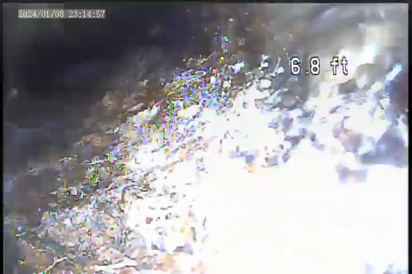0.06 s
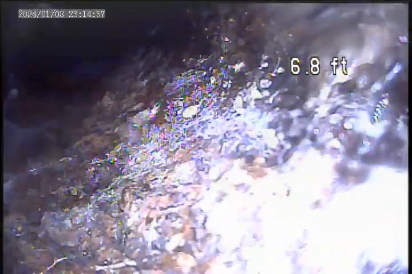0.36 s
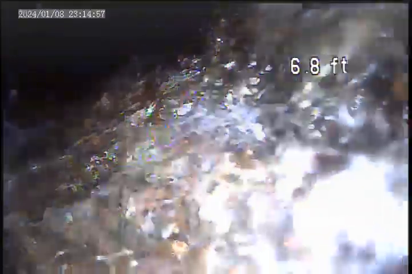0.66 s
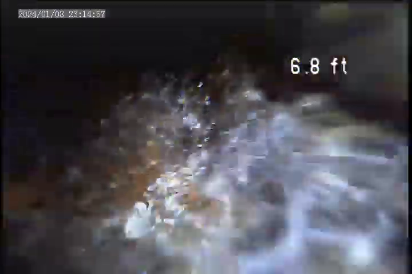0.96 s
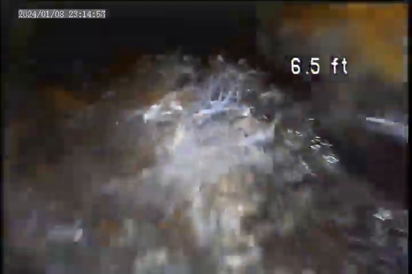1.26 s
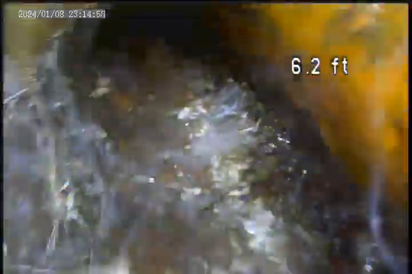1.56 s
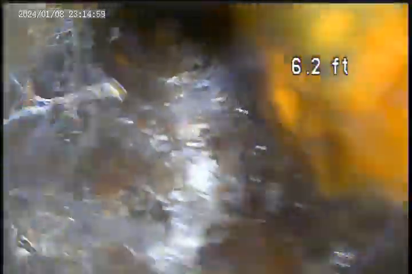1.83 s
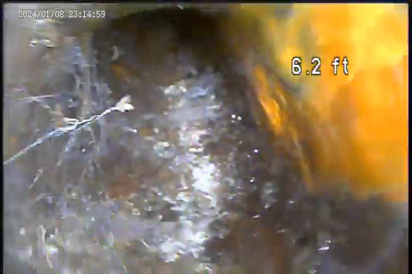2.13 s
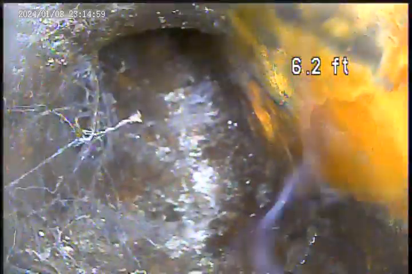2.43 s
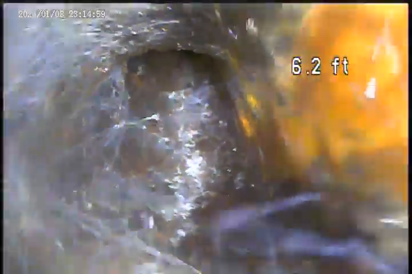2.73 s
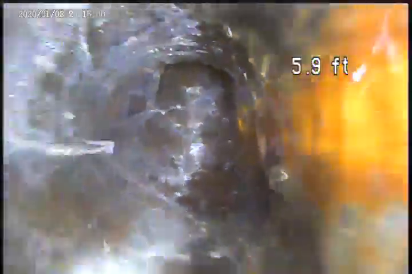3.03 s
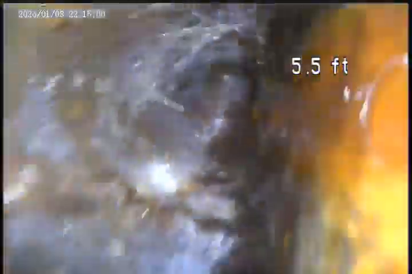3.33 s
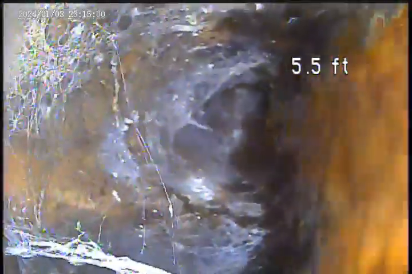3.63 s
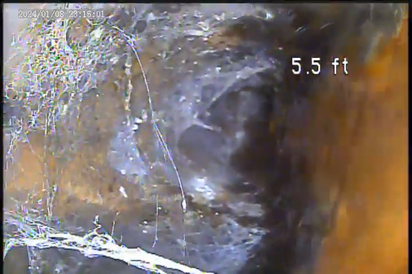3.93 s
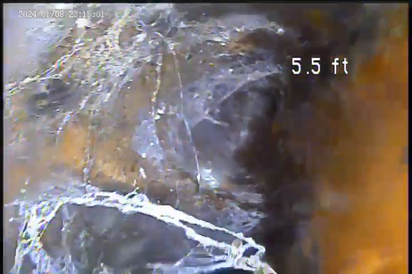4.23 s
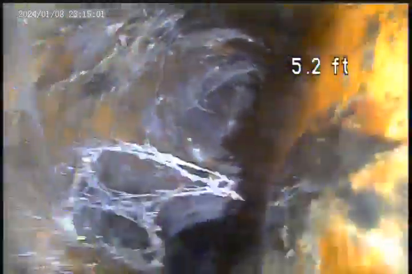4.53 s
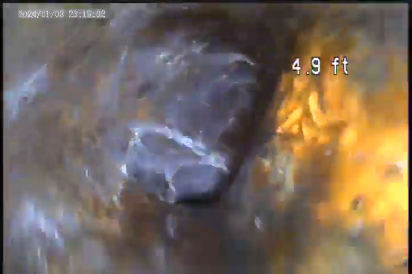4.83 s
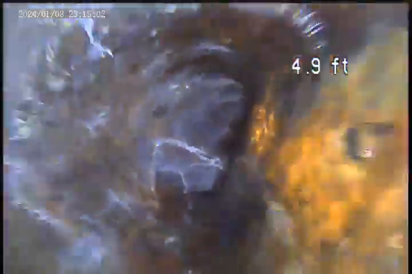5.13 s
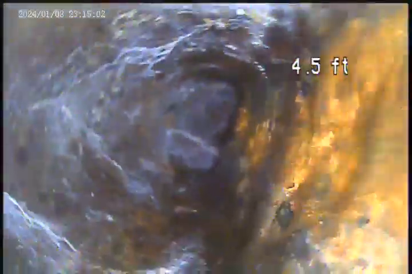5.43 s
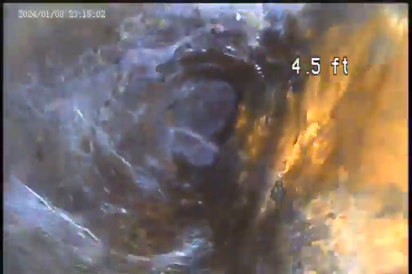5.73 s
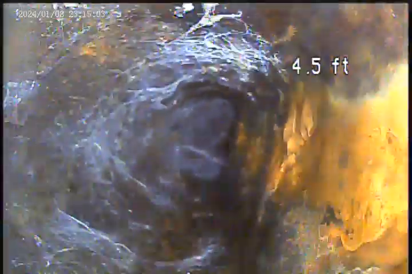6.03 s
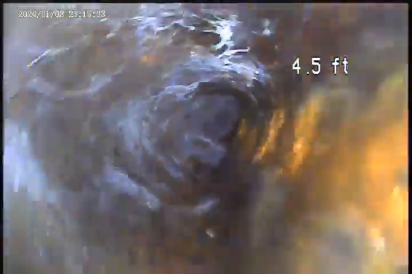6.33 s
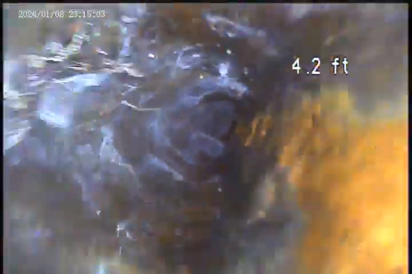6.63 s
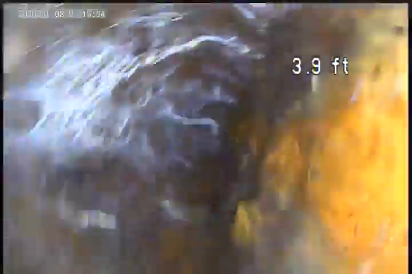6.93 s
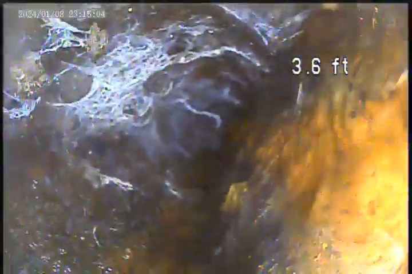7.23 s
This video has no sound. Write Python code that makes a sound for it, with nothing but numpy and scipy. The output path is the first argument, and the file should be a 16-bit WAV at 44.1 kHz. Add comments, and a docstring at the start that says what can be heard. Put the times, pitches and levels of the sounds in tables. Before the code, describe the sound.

A steady low electrical buzz runs throughout, over rumble, a faint equipment whirr and hiss. A drain camera's push cable is drawn back in short pulls, each making a soft rubbing swish. Now and then it clacks against its reel, ringing briefly in a small hard room, with the sharpest clack past the middle. Everything is heard from the monitor.

```python
"""A drain camera's push cable slides back in short pulls and now and then clacks against its reel.
The jacket rubs with a swish that follows each pull; a clack rings the reel and a small hard room.
Heard at the monitor, where the picture signal leaks into the sound as a low buzz, one pulse a
video frame, over rumble, equipment whirr and hiss."""
import sys
import numpy as np
from scipy import signal
from scipy.fft import rfft, irfft
from scipy.io import wavfile
from scipy.ndimage import uniform_filter1d

SR = 44100
rng = np.random.default_rng(int(sys.argv[2]) if len(sys.argv) > 2 else 0)


def int16_out(signal):
    """Quantize to a 16-bit WAV file."""
    q = np.round(np.clip(np.atleast_2d(signal).T, -1, 1) * 32767)
    wavfile.write(sys.argv[1], SR, q.astype(np.int16))


N = 325017
TIME = np.arange(N) / SR


def amp(db):
    """Decibels to gain."""
    return 10 ** (np.asarray(db) / 20)


def unit(x):
    """Scale to rms 1."""
    return x / np.sqrt(np.mean(x ** 2) + 1e-20)


def lookup(curve, hz):
    """Interpolate a table on a log-frequency axis."""
    freq_hz, value = np.transpose(curve)
    return np.interp(np.log(hz + 1), np.log(freq_hz + 1), value)


def add(mix, start_s, sound):
    """Mix a sound in at start_s."""
    part = mix[max(round(start_s * SR), 0):][:len(sound)]
    part += sound[:len(part)]


def shaped_noise(spectrum):
    """Noise with a tabled spectrum, rms 1."""
    gain = amp(lookup(spectrum, np.fft.rfftfreq(N, 1 / SR)))
    return unit(irfft(rfft(rng.standard_normal(N)) * gain, N))


def band_noise(centre_hz, width_hz):
    """Noise in one resonance, rms 1; a random drift when centred on 0 Hz."""
    detune = (np.fft.rfftfreq(N, 1 / SR) - centre_hz) / width_hz
    return unit(irfft(rfft(rng.standard_normal(N)) / (1 + detune ** 2), N))


# Equipment whirr: centre_hz, width_hz, level_db
WHIRR_BANDS = [(846, 76, -68.5), (960, 99, -72.5), (1420, 276, -76), (2080, 110, -88)]
# Hum and line-scan whistle: freq_hz, level_db
STEADY_TONES = [(50, -66), (15734, -95)]
# Low rumble: freq_hz, density_db
RUMBLE_SPECTRUM = [(8, -13), (18, -5.5), (27, 6.5), (38, -7.5), (68, 0.5), (90, -3.5), (115, -3.5),
                   (160, -8.5), (210, -16), (280, -12), (390, -20.5), (540, -20), (700, -24.5), (1200, -32),
                   (3000, -59.5)]
# Electronic hiss: freq_hz, density_db
HISS_SPECTRUM = [(300, -7), (1200, -0.5), (2000, 3.5), (4500, 1.5), (6500, -1), (10000, -2.04), (15500, -1)]


def background(rumble_db=-50.5, hiss_db=-68.5):
    """Rumble under the equipment's airy whirr, steady tones and hiss."""
    whirr = sum(amp(db) * band_noise(hz, width_hz) for hz, width_hz, db in WHIRR_BANDS)
    tones = sum(amp(db) * unit(np.sin(2 * np.pi * hz * TIME)) for hz, db in STEADY_TONES)
    rumble = amp(rumble_db) * shaped_noise(RUMBLE_SPECTRUM)
    hiss = amp(hiss_db) * shaped_noise(HISS_SPECTRUM)
    return rumble + whirr + tones + hiss


# Partials of the frame rate: harmonic, gain_db
BUZZ_PARTIALS = [(1, 1.5), (2, -4.5), (3, -5), (4, -5.5), (5, -11.5), (6, -12.5), (7, -14.5), (8, -17.5),
                 (9, -21), (10, -24.5), (11, -25.5), (12, -24.5), (13, -31), (14, -28.5), (15, -32.5),
                 (16, -50), (17, -30), (18, -31.5), (19, -32), (20, -33.5)]
FRAME_HZ, FIRST_FRAME_S = 29.969, 0.00973


def frame_buzz(level_db=-44.5, rasp_db=-68, flutter=0.044, lilt=0.039,
               jitter_s=0.00017, bass_cut_hz=36, spike_s=0.0016):
    """Picture signal leaking into the sound: one sharp, raspy pulse a frame, uneven in height."""
    cycles = (TIME - FIRST_FRAME_S + jitter_s * band_noise(0, 0.79)) * FRAME_HZ
    wave = np.zeros(N)
    for harmonic, gain_db in BUZZ_PARTIALS:
        lead_rad = np.arctan((bass_cut_hz / (harmonic * FRAME_HZ)) ** 2)  # from the input's bass cut
        wave += amp(gain_db) * np.cos(2 * np.pi * harmonic * cycles + lead_rad)
    frame = np.round(cycles).astype(int)
    spike = np.exp(-((cycles - frame) / FRAME_HZ / spike_s) ** 2)
    third_frame_accent = lilt * np.cos(2 * np.pi * cycles / 3)
    height = 1 + third_frame_accent + flutter * spike * np.tanh(rng.standard_normal(N))[frame]
    rasp = unit(spike * band_noise(240, 170))
    return amp(level_db) * unit(wave) * height + amp(rasp_db) * rasp


# Colour of a clack: freq_hz, density_db
CLACK_SPECTRUM = [(200, -23), (700, -8), (1300, -6.5), (2100, -0.5), (3000, 0.5), (4200, 3.5), (5200, -0.5),
                  (6200, -6), (7600, -6), (11000, -9), (15500, -17)]


def rough_contact(contact_s, fft_size=4096, bands=70):
    """A snap: each part of the spectrum leaves after its own random delay, scaled by contact_s."""
    hz = np.fft.rfftfreq(fft_size, 1 / SR)
    band_delay_s = contact_s * rng.gamma(3, 0.5, bands)
    delay_s = np.interp(hz, np.linspace(0, SR / 2, bands), band_delay_s)
    phase_rad = -2 * np.pi * np.cumsum(delay_s) * SR / fft_size
    snap = irfft(amp(lookup(CLACK_SPECTRUM, hz)) * np.exp(1j * phase_rad))[:fft_size // 2]
    return np.pad(snap, (0, SR - len(snap)))


# Small hard room: freq_hz, t60_s
ROOM_DECAY = [(500, .4), (1500, 0.51), (4000, 0.48), (8000, 0.43), (15000, 0.23)]


def room_tail(build_s=0.1, near_db=2, near_s=0.017):
    """A clack's reflections: near surfaces first, then a dense field dying band by band."""
    hz, t, noise = signal.stft(rng.standard_normal(SR), SR, nperseg=128)
    arrivals = np.hypot(amp(near_db) * np.exp(-t / near_s), 1 - np.exp(-t / build_s))
    decay_db = 60 * t / lookup(ROOM_DECAY, hz)[:, None]
    gain = amp(lookup(CLACK_SPECTRUM, hz)[:, None] - decay_db) * arrivals
    return signal.istft(noise * gain, SR, nperseg=128)[1][:SR]


# Reel resonances: freq_hz, gain_db, t60_s
REEL_MODES = [(1330, 4.5, 0.06), (1810, 0.5, 0.1), (2020, -15, 0.061), (2180, 8.5, 0.051), (2330, 9, .06),
              (3280, 11, 0.057), (4170, -24, 0.069), (4000, -22, 0.15), (4520, 3, .05), (4580, -12, 0.028),
              (4900, 0, 0.086), (5735, -32, .05), (7330, -18, 0.08), (7360, 4, 0.085), (10600, 7, 0.023)]
# Cable hits on the reel: start_s, level_db, contact_s, pitch_hz, cutoff_hz
REEL_HITS = [(0.453, -60, .002, 5200, 6000), (0.477, -56, 0.0018, 3200, 4000),
             (0.5044, -46, .0026, 2230, 5290), (0.5137, -52.5, 0.0014, 3260, 3600),
             (.7370, -62.5, 0.0011, 4460, 6000), (0.8257, -59, 0.0024, 2800, 5000),
             (.9930, -66, 0.0026, 2400, 2820), (2.2758, -44, 0.0018, 3720, 5950),
             (2.3420, -55.5, 0.0034, 5010, 6470), (3.019, -60, 0.001, 2750, 2620),
             (3.3750, -56, 0.0043, 4160, 9000), (3.6032, -62, 0.002, 2500, 2620),
             (4.822, -59, 0.00063, 3320, 3650), (5.223, -32, 0.00055, 5190, 17000),
             (5.9538, -62, .001, 5030, 5460), (6.522, -51, 0.0014, 2434, 4300),
             (6.531, -61, 0.00089, 3400, 4070)]


def reel_clacks(knock_db=-7, knock_s=0.0018, ring_db=-8, room_db=-0.5):
    """The cable strikes the reel: a snap and a dead knock, then reel ring and room tail."""
    t, out = np.arange(SR) / SR, np.zeros(N)
    for start_s, level_db, contact_s, pitch_hz, cutoff_hz in REEL_HITS:
        snap = rough_contact(contact_s)
        rise = 1 - np.exp(-t / contact_s)
        knock = rise * np.exp(-t / knock_s) * np.sin(2 * np.pi * pitch_hz * t)
        ring = rise * sum(amp(db - 60 * t / t60_s) * np.sin(2 * np.pi * (hz * t + rng.random()))
                          for hz, db, t60_s in REEL_MODES)
        hit = unit(snap) + amp(ring_db) * unit(ring) + amp(room_db) * unit(rise * room_tail())
        # softer contacts: less treble, more knock
        hit = signal.lfilter(*signal.butter(2, cutoff_hz, fs=SR), hit)
        hit = unit(hit) + amp(knock_db) * (2 * pitch_hz / cutoff_hz) * unit(knock)
        add(out, start_s, amp(level_db) * np.sqrt(0.005) * unit(hit))  # level: all energy in 5 ms
    return out


# Cable pulls, peaking at top speed: peak_s, level_db, rise_s, fall_s, pitch_hz
CABLE_PULLS = [(0.0, -70.5, .1, .16, 3220), (0.46, -64, .26, .22, 4146), (0.84, -69, .08, .24, 3600),
               (1.35, -70.5, .26, 0.43, 4600), (2.3, -63.5, .29, .11, 4300), (2.84, -68.5, .26, 0.17, 3600),
               (3.39, -65.5, .27, .13, 4510), (3.81, -67, .2, .3, 3400), (4.78, -67.5, .2, 0.25, 3750),
               (5.2, -69, 0.22, .36, 4030), (5.86, -66, .37, 0.14, 3850), (6.43, -67, .16, 0.34, 3900),
               (6.96, -66, .24, 0.15, 3700), (7.36, -67, .09, .1, 3560)]


def pull_motion(ease_db=9, ease_shape=1.3, sag_hz_per_db=70, creep_db=-79, creep_hz=2999):
    """Rub level (dB) and swish pitch (Hz): both rise and fall with each pull, over a slow creep."""
    power = np.full(N, amp(creep_db) ** 2)
    weighted_pitch = creep_hz * power
    for peak_s, level_db, rise_s, fall_s, pitch_hz in CABLE_PULLS:
        from_peak = np.maximum((peak_s - TIME) / rise_s, (TIME - peak_s) / fall_s)
        drop_db = ease_db * from_peak ** ease_shape
        pull_power = amp(level_db - drop_db) ** 2
        power += pull_power
        weighted_pitch += pull_power * (pitch_hz - sag_hz_per_db * drop_db)
    return 10 * np.log10(power), weighted_pitch / power


def contact_resonances(rub, depth_db=2, span_frames=22, span_bins=4):
    """Narrow resonances come and go at random as the point of contact shifts."""
    spectra = signal.stft(rub, nperseg=512, noverlap=384)[2]
    patches = uniform_filter1d(rng.standard_normal(spectra.shape), span_frames, axis=1)
    patches = unit(uniform_filter1d(patches, span_bins, axis=0))
    return signal.istft(spectra * amp(depth_db * patches), nperseg=512, noverlap=384)[1][:N]


# Jacket friction: freq_hz, density_db
RUB_SPECTRUM = [(900, -27), (1700, -7.5), (2200, -0.5), (2700, -1), (3500, -3.5), (4200, -2), (5200, -3),
                (6000, -12), (8000, -13), (12000, -27), (16000, -34)]


def cable_slide(trim_db=-1, swish_db=-4.5, swish_width_hz=750):
    """The cable jacket rubs: friction noise plus a broad resonance that rises with each pull."""
    level_db, pitch_hz = pull_motion()
    friction = shaped_noise(RUB_SPECTRUM)
    carrier = np.cos(2 * np.pi * np.cumsum(pitch_hz) / SR)
    swish = amp(swish_db) * unit(carrier * band_noise(0, swish_width_hz))
    return amp(level_db + trim_db) * unit(contact_resonances(friction + swish))


def scene():
    """Cable sounds over the buzz and noise of the equipment, mono."""
    return (frame_buzz() + background() + cable_slide() + reel_clacks())[None]


def record(dry):
    """Steep low-pass at 15850 Hz."""
    lowpass = signal.firwin(1023, 15850, window=("kaiser", 9), fs=SR)
    return signal.oaconvolve(dry, lowpass[None], "same")


dry = scene()
out = record(dry)
int16_out(out)
```